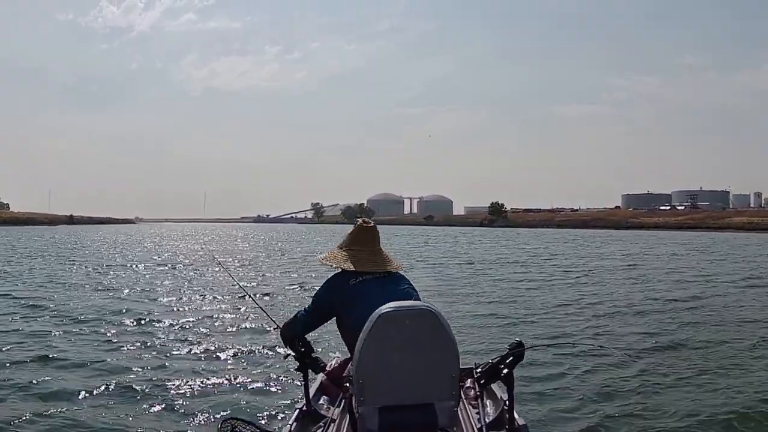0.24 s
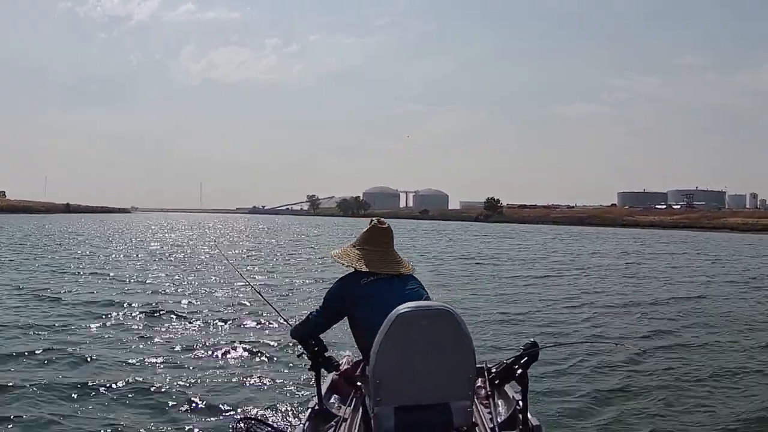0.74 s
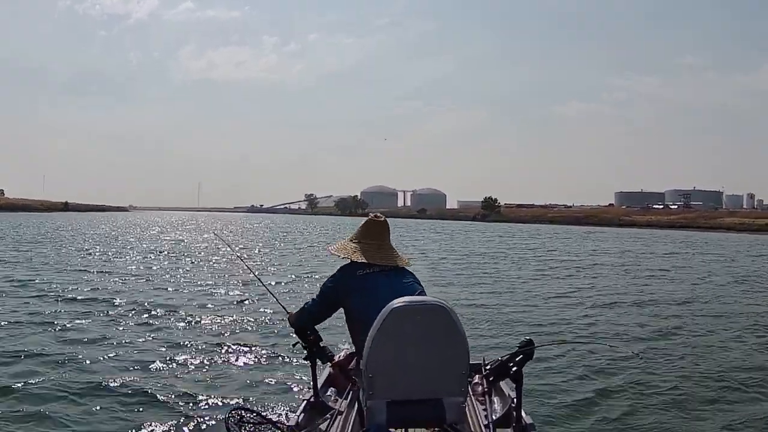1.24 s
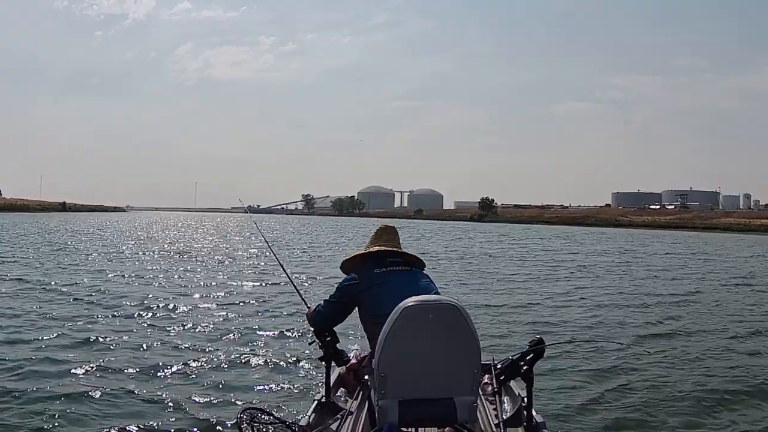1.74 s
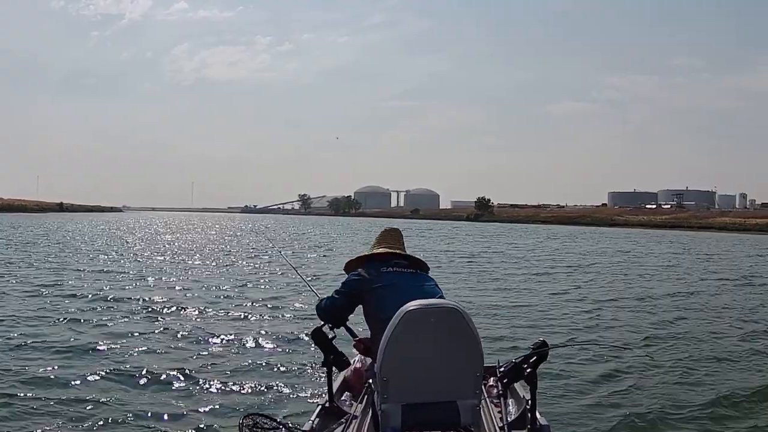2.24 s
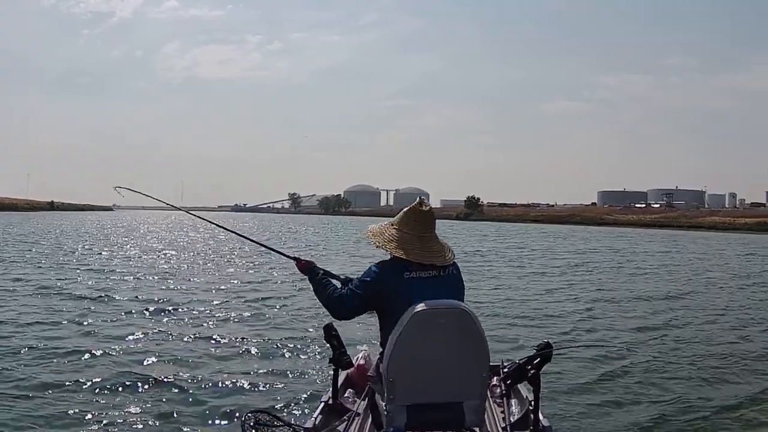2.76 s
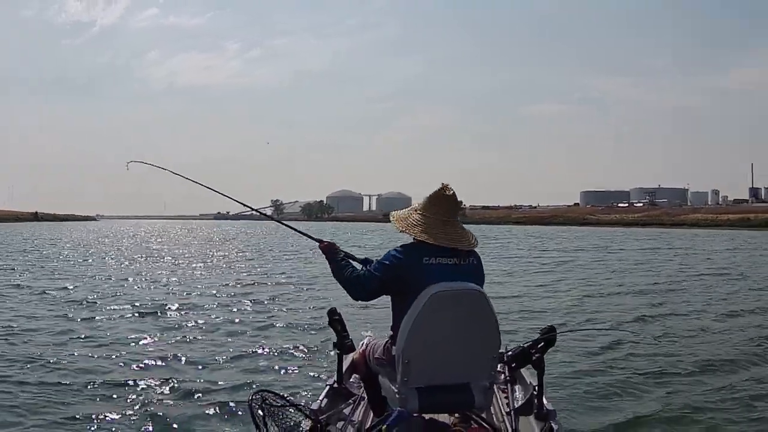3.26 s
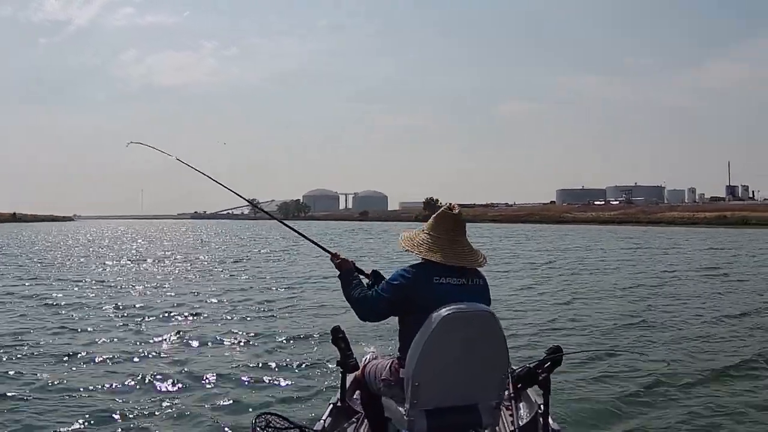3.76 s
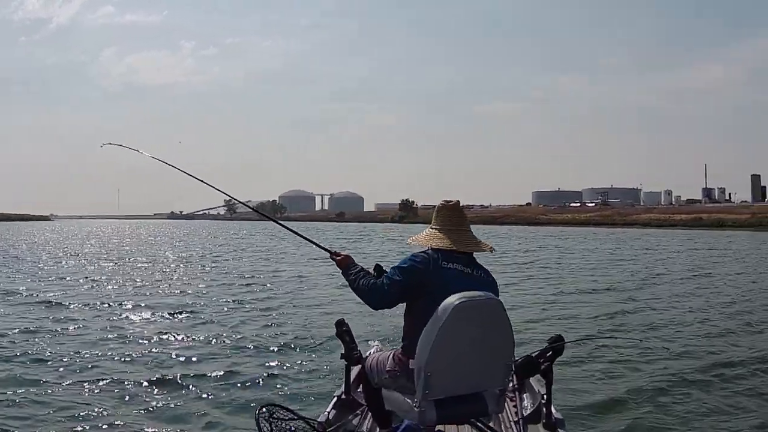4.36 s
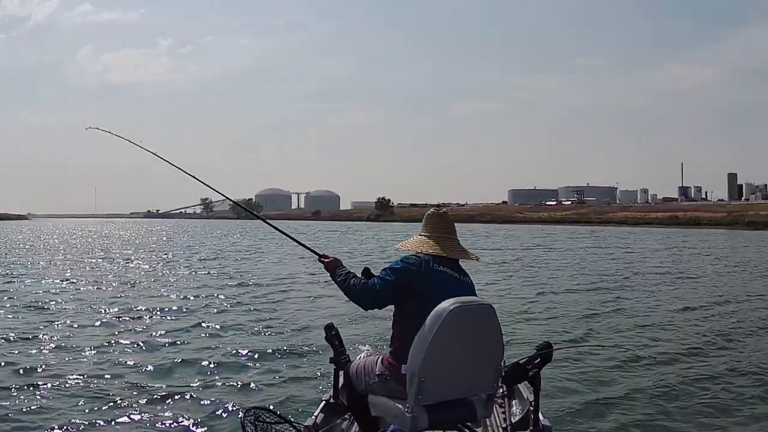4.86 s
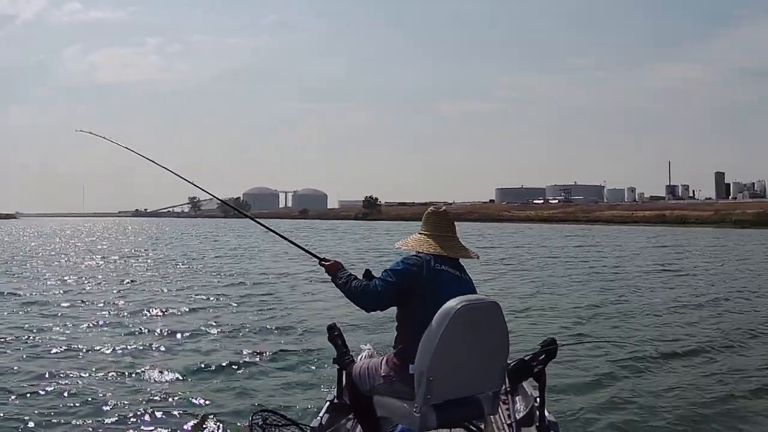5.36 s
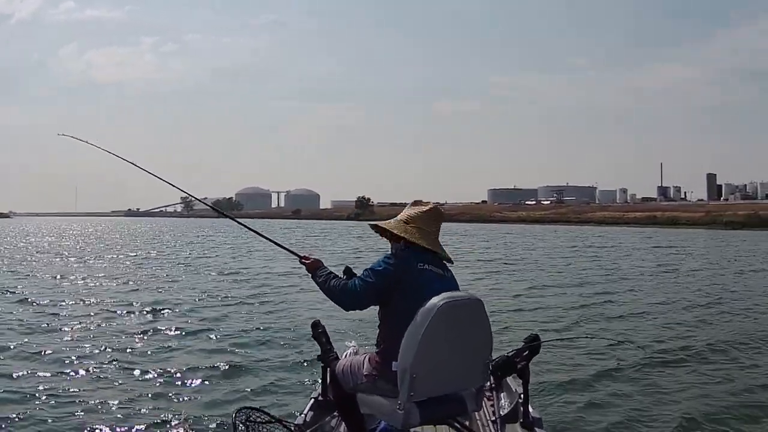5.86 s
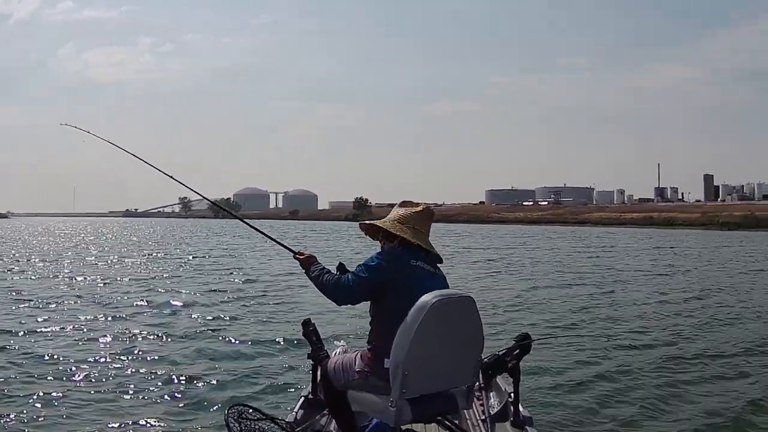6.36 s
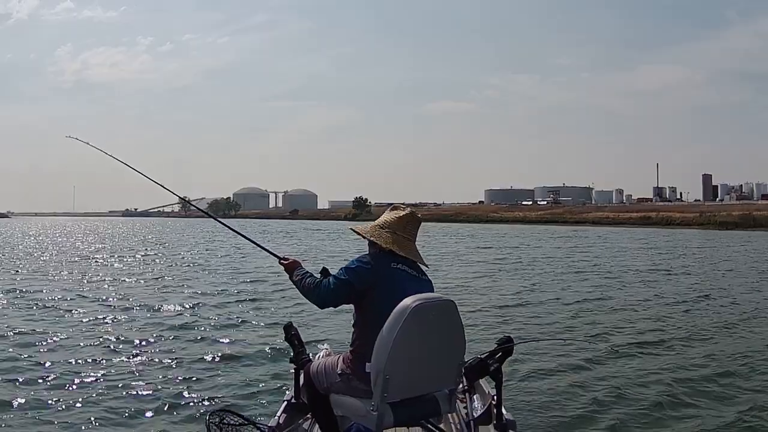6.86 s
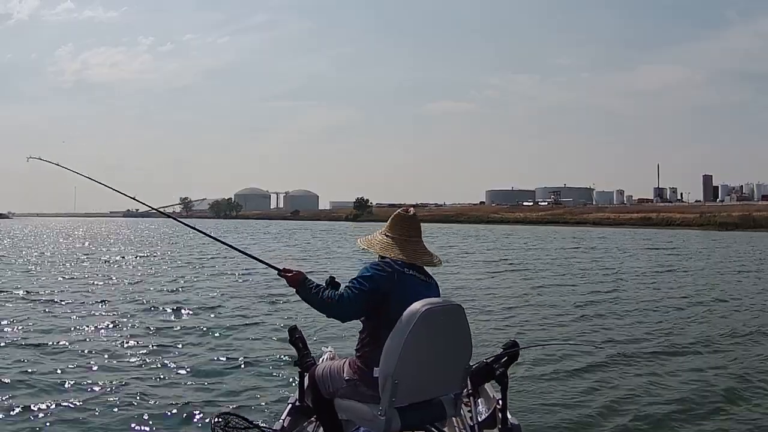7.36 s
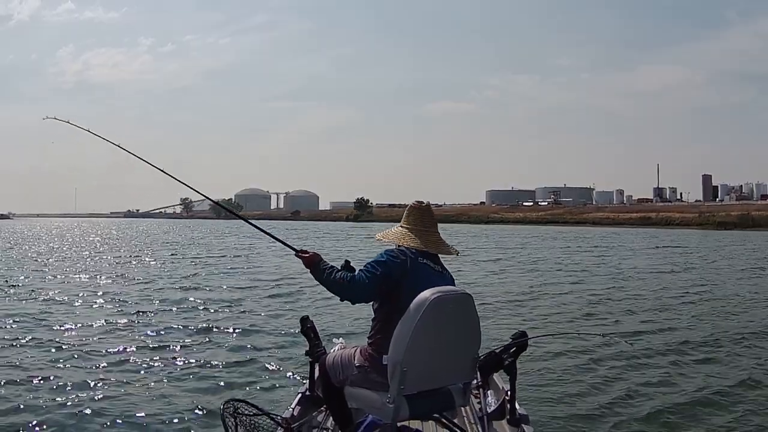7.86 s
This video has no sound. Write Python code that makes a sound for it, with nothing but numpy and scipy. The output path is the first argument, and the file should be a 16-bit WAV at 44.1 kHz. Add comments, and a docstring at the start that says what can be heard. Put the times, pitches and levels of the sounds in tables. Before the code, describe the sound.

Close up on a small boat, a fishing reel clicks dryly and irregularly, at first only an isolated click and bumps, then a dense chattering run. Loose-part rattles bounce between further bursts, with louder knocks in the middle. It thins to a near pause, then clicks again more softly. A faint low motor hum stays far away, and gusty wind rumbles lightly on the microphone outdoors.

```python
"""A fishing reel is cranked on a small boat, heard close by through the hull: its pawl drops from tooth
to tooth and rebounds, each blow exciting damped modes. A loose part rattles in bouncing runs, dull bumps
ring low, and hands and gear rub and slide as flickering coloured noise. Far over the water a motor hums
in wavering sines; wind rumbles on the microphone in gusty low noise over steady outdoor air."""
import sys
import numpy as np
from scipy import signal
from scipy.fft import rfft, irfft, next_fast_len
from scipy.io import wavfile
from scipy.ndimage import uniform_filter1d, map_coordinates

SR = 44100
rng = np.random.default_rng(int(sys.argv[2]) if len(sys.argv) > 2 else 0)


def put_to_file(sound):
    """Save the sound as 16-bit audio at rate SR, in the file named by the first command-line argument."""
    columns = np.atleast_2d(sound).T  # one column per channel
    safe = np.clip(columns, -1, 1)
    whole_steps = np.round(safe * 32767)
    wavfile.write(sys.argv[1], SR, whole_steps.astype(np.int16))


N = 357651  # length in samples

# Pawl drops. Each row: start in seconds, level of the crack in dB, level of the housing in dB.
PAWL_DROPS = [(0.468, -35.5, -22.5), (1.3238, -41, -34), (1.3635, -35.5, -27), (1.3741, -32, -31.5),
              (1.4022, -51, -48), (1.5048, -36, -29.5), (1.5412, -34.5, -29), (1.5937, -26.5, -26.5),
              (1.6246, -35, -28), (1.6297, -36, -42), (1.6715, -30, -24.5), (1.687, -33, -36),
              (1.7056, -38, -28), (1.7115, -39, -30), (1.7241, -37, -42), (1.7443, -41.5, -30.5),
              (1.7505, -40.5, -34), (1.7845, -46, -36.5), (1.8341, -40.5, -31), (1.84, -44.5, -31),
              (1.878, -36, -28.5), (1.884, -38, -36), (1.93, -29, -25.5), (1.9652, -33, -29.5),
              (2.0644, -43.5, -35), (2.1385, -37.5, -29.5), (2.1843, -29, -25.5), (2.2309, -29.5, -25),
              (2.2649, -40, -30), (2.2682, -39.5, -39), (2.3074, -31, -28), (2.3166, -45.5, -50),
              (2.3575, -36, -30.5), (2.3865, -37, -30.5), (2.4542, -35, -32), (2.4802, -36.5, -30.5),
              (2.526, -49, -40), (2.5376, -33.5, -29), (2.546, -38, -39), (2.5702, -36, -29),
              (2.5888, -38.5, -36), (2.6106, -36, -28.5), (2.6192, -38.5, -35), (2.6522, -34, -26.5),
              (2.6592, -40.5, -30), (2.698, -31.5, -23.5), (2.7045, -34.5, -29), (2.7455, -26.5, -23),
              (3.4145, -30, -17.5), (3.4269, -37, -30), (3.4333, -43, -31), (3.4441, -41, -35),
              (3.4646, -29.5, -23), (3.474, -37, -24.5), (3.4859, -27.5, -26), (3.4945, -32.5, -30),
              (3.4977, -31.5, -25.5), (3.5129, -36, -26), (3.5197, -39, -31), (3.5616, -35, -31),
              (3.6037, -37.5, -29), (3.6441, -47, -37), (3.6517, -48, -35.5), (3.659, -46, -45),
              (3.6874, -43, -30.5), (4.2654, -27, -21), (4.2747, -39.5, -34), (4.2862, -42, -40),
              (4.3324, -52, -29), (4.3358, -35, -24), (4.3433, -26.5, -24), (4.3608, -52, -40),
              (4.392, -34, -28.5), (4.5619, -23.5, -17), (4.6041, -30, -20.5), (4.6588, -52.5, -46),
              (4.6995, -33, -35), (4.7076, -36.5, -29.5), (4.7301, -45, -32), (4.94, -67, -35.5),
              (5.0019, -32, -22.5), (5.0306, -32.5, -24.5), (5.0391, -50, -39), (5.0638, -53, -34),
              (5.2569, -48.5, -40.5), (6.464, -59, -45), (6.4773, -59, -43), (6.4885, -32.5, -27),
              (6.503, -37, -31), (6.5474, -41, -34), (6.5625, -44, -39), (6.5947, -47, -35.5),
              (6.6004, -57.5, -44), (6.6385, -49.5, -37.5), (6.6448, -46.5, -47), (6.7296, -46, -34),
              (6.8148, -34, -29.5), (6.8571, -30.5, -29), (6.8987, -29, -25), (6.9438, -32, -28.5),
              (6.9823, -36.5, -30), (6.9953, -39.5, -38), (7.032, -43.5, -33), (7.0375, -40, -34.5),
              (7.0735, -38, -31), (7.0785, -32.5, -29.5), (7.1213, -33.5, -29.5), (7.1487, -52.5, -37),
              (7.1957, -40.5, -28.5), (7.2799, -46.5, -33.5), (7.329, -35.5, -28), (7.3902, -39, -31.5),
              (7.4095, -40, -36), (7.4286, -36.5, -30), (7.4345, -47, -41), (7.4475, -44, -34.5),
              (7.5177, -52, -43.5), (8.0473, -25, -21), (8.0502, -29, -32.5), (8.0695, -35.5, -28.5)]
# Mean delay of the rebound in seconds, its mean level over the crack in dB, its level scatter in dB.
REBOUND_S, REBOUND_DB, REBOUND_SCATTER_DB = 0.00084, -4.5, 4

# Modes of the crack, the rebounding spring, the reel housing, the hard plate and the plate's treble.
# Each row: mean frequency in Hz, mean relative level in dB, time to decay by 60 dB in seconds.
CRACK_MODES = [(2350, 1.5, 0.0081), (2910, 13.5, 0.0052), (3982, 0.5, 0.013), (4993, 7.5, 0.0054),
               (6070, 10.5, 0.0037), (6550, -0.5, 0.0048), (8270, 0, 0.0054), (10300, -22.5, 0.001),
               (13190, -16, .004)]
SPRING_MODES = [(3936, -4, 0.016), (4440, -11.5, 0.015), (6500, -9.5, 0.0027), (8466, 0.5, 0.0043)]
HOUSING_MODES = [(795, 2, 0.024), (728, -13.5, 0.052), (879, -4, 0.019), (559, -23.5, 0.0047),
                 (1119, -8, 0.02), (1551, -11.5, 0.016)]
PLATE_MODES = [(1516, -4.5, 0.0088), (2376, -6, 0.0083), (2729, 5, 0.0077), (2956, 2.5, 0.0081),
               (3830, 0, 0.0053), (4510, 2, 0.006), (5400, -8.5, 0.0061)]
EDGE_MODES = [(6050, 10, 0.0031), (7980, 12, 0.0021), (10000, -4, 0.0043), (11100, -13.5, 0.0031),
              (13000, -7, 0.0036), (15000, -18, .003)]

# A loose part drops on a hard plate and bounces. Each row: start in seconds, level of the first tick in dB,
# first flight in seconds, ratio of each flight to the one before, loss per bounce in dB (below 0: shaken
# ever harder), length of the run in seconds, treble over the first tick in dB.
RATTLE_RUNS = [(0.8624, -23.5, .0150, .75, 2.5, .044, -17), (1.1572, -41, .0140, 1, -4.5, .032, -17),
               (1.211, -36, .0236, 1, -14, .03, -14), (2.9585, -25.5, .0255, .69, 2.5, .072, -15.5),
               (3.2288, -16.5, .0232, .70, 5, .067, -8.5), (3.9014, -40.5, 0.0057, 1.2, -7, .01, -12),
               (3.915, -24, .0200, .70, 3, .052, -14), (4.12, -16.5, .0235, .89, 5, .085, -8.5),
               (4.69, -31.5, .0085, 1, 0, .004, -20), (4.723, -21.5, .0133, .78, 6, .044, -8),
               (5.6431, -40.5, 0.01, .7, 5, .011, -26), (6.0827, -34, .01, .7, 4, .004, -24),
               (7.4785, -38.5, .0112, .7, 9, .013, -13.5), (7.8153, -37, .012, .7, 4.5, .014, -32),
               (7.8569, -44.5, .01, .7, 4, .004, -19), (7.897, -53.5, .01, .7, 6, .004, -17)]
# Housing level in dB at a tick of -29.5 dB, its growth in dB per dB of tick.
ANSWER_DB, ANSWER_GROWTH = -37.5, .6
TREBLE_LOSS_DB = 1  # treble lost per bounce, beyond the loss of the tick

# Dull bumps on the boat. Each row: start in seconds, level in dB, mean pitch in Hz.
BUMPS = [(0.166, -41, 1060), (0.282, -44, 745), (0.332, -40, 390), (1.132, -28.5, 895), (1.133, -37, 1520),
         (1.136, -32, 446), (1.15, -31, 298), (2.904, -31, 685), (3.816, -30.5, 653), (4.254, -42, 776),
         (4.335, -22, 730), (4.836, -46.5, 790), (4.887, -52.5, 780), (5.121, -45, 790),
         (5.149, -39.5, 780), (5.4, -39.5, 714), (6.782, -44, 930), (7.594, -40.5, 1020),
         (7.612, -47, 1080)]

# Continuous friction. Each row: time in seconds, rubbing in the housing in dB, gear hiss in dB.
FRICTION_LEVELS = [(0.0, -52, -70), (0.9, -60, -73), (1.58, -59, -74), (1.76, -46.5, -69), (1.94, -63, -71),
                   (2.17, -56, -71), (2.53, -57.5, -72.5), (2.73, -57.5, -76), (3.03, -64, -69.5),
                   (3.66, -53, -68), (3.97, -59.5, -64.5), (4.52, -59, -77.5), (5.08, -56.5, -67.5),
                   (5.64, -64.5, -79.5), (6.53, -66, -78), (6.98, -57, -68.5), (7.61, -65.5, -78),
                   (8.11, -59.5, -68)]
# Short rubs of hands and gear. Each row: start in seconds, end in seconds, housing in dB, gear hiss in dB.
RUBS = [(1.131, 1.155, -30, -51), (1.167, 1.228, -39, -57.5), (3.032, 3.072, -53, -60.5),
        (3.194, 3.219, -55, -60.5), (3.681, 3.752, -52, -53), (3.838, 3.905, -59, -83),
        (4.29, 4.355, -40.5, -48), (4.644, 4.668, -49, -56.5), (4.732, 4.801, -43.5, -63),
        (4.943, 5.005, -56, -63), (5.119, 5.202, -53, -77), (5.229, 5.312, -55, -65),
        (7.389, 7.483, -46.5, -66), (7.578, 7.684, -55, -83), (8.066, 8.105, -44.5, -59)]
# Something hard slides over the plate. Each row: start in seconds, end in seconds, level in dB.
SCRAPES = [(0.829, 0.85, -44), (3.458, 3.47, -31.5), (3.901, 3.929, -34), (4.693, 4.703, -32.5),
           (5.208, 5.224, -38.5), (5.59, 5.668, -54.5), (7.852, 7.876, -57.5)]
SCRAPE_HOUSING_DB, SCRAPE_HISS_DB = 5, -13  # housing and gear hiss over the plate, in dB

# Noise spectra of housing rub, plate scrape and gear hiss.
# Each row: frequency in Hz, relative density in dB per Hz.
RUB_SPECTRUM = [(300, -46.5), (500, -1), (750, 2), (1150, -3), (1350, -9.5), (1800, -47.5)]
SCRAPE_SPECTRUM = [(1250, -30), (1550, -1), (1900, -18), (2500, -10), (3050, -1), (3600, -20), (4100, -12),
                   (4600, 0), (5100, -3), (5600, -24), (7000, -40), (15000, -70)]
HISS_SPECTRUM = [(900, -39.5), (1500, 2), (2000, -5.5), (2400, -3.5), (3000, -5.5), (3450, -6.5),
                 (3950, -4.5), (4600, -8.5), (5400, -12.5), (7000, -16), (10000, -27), (15000, -29.5)]

# Lines of the distant motor. Each row: mean frequency in Hz, mean rms level in dB.
MOTOR_LINES = [(96.9, -52.5), (140.0, -62.5), (193.8, -67.5), (290.7, -68)]

# Wind on the microphone. Each row: time in seconds, mean deep rumble in dB, mean wash in dB.
WIND_LEVELS = [(0.0, -67, -44), (0.15, -53, -53), (0.43, -49, -41.5), (0.67, -58, -52), (0.74, -49.5, -41),
               (1.04, -58, -47), (1.15, -42, -39.5), (1.33, -43, -58), (1.5, -50, -47), (1.93, -50, -43),
               (2.03, -58, -57.5), (2.75, -41.5, -48), (2.94, -51, -55.5), (4.0, -50, -54),
               (4.4, -56.5, -46), (4.54, -57.5, -56.5), (5.08, -52, -48.5), (5.2, -47, -44),
               (5.51, -44, -45), (5.59, -60.5, -56), (7.0, -57.5, -57.5), (7.15, -50, -44),
               (7.25, -57, -57), (8.11, -53, -55)]
# Noise spectra of deep wind rumble, wind wash and outdoor air.
# Each row: frequency in Hz, relative density in dB per Hz.
RUMBLE_SPECTRUM = [(20, -25), (50, -15.5), (90, 0.5), (120, -0.5), (170, -28.5), (300, -60.5)]
WASH_SPECTRUM = [(70, -40.5), (130, -1.5), (200, 2), (300, -9), (420, -16.5), (600, -28), (900, -66)]
AIR_SPECTRUM = [(20, -30.5), (70, -6), (200, -12), (400, -30.5), (1100, -27.5), (1400, -36.5),
                (3000, -42.5), (16000, -43)]

TOP_HZ = 16000  # upper band limit of the microphone


def amp(db):
    """Logarithmic level: the gain that belongs to a level in dB."""
    return 10 ** (np.asarray(db) / 20)


def unit(x):
    """Power normalisation: x at rms 1."""
    return x / np.sqrt(np.mean(x ** 2) + 1e-20)


def wobble(rate):
    """Slow random fluctuation: a smooth curve through rate random knots a second."""
    knots = rng.standard_normal(int(N * rate / SR) + 4)
    return map_coordinates(knots, [np.arange(N) * rate / SR])


def curves(rows):
    """Linear interpolation of level: one gain per sample for each dB column after the time."""
    times, *columns = np.transpose(rows)
    return [amp(np.interp(np.arange(N) / SR, times, db)) for db in columns]


def filtered(x, response):
    """Linear filtering: the spectrum of x times a response of frequency."""
    size = next_fast_len(N + 8192)
    spectrum = rfft(x, size) * response(np.fft.rfftfreq(size, 1 / SR))
    return irfft(spectrum, size)[..., :N]


def rush(spectrum, grain_db, grain_rate, patchy_db=0):
    """Filtered noise: coloured, of rms 1, its drive flickering in grains and swelling in narrow patches."""
    f, db = np.transpose(spectrum)
    grains = rng.standard_normal(N) * amp(grain_db * wobble(grain_rate))
    z = signal.stft(grains, nperseg=256)[2]
    # Patches are smoothed over 3 frequency bins and 16 time frames.
    patches = uniform_filter1d(rng.standard_normal(z.shape), size=3, axis=0)
    patches = uniform_filter1d(patches, size=16, axis=1)
    drive = signal.istft(z * amp(patchy_db * unit(patches)), nperseg=256)[1][:N]

    def colour(hz):
        """Spectral envelope: density over log frequency, almost nothing below the first row."""
        return amp(np.interp(np.log(hz + 1), np.log(f), db, -120, db[-1]))

    return unit(filtered(drive, colour))


def add_blow(out, s, db, modes, chatter, chatter_s, attack, echo_db):
    """Modal impact: damped modes, chattering contacts and hull scatter; db is the rms level over 5 ms."""
    t = np.arange(2600) / SR
    hz, level, t60 = np.transpose(modes)[:, :, None]
    # Every blow excites each mode at a new strength (2.5 dB) and pitch (1.8 %).
    level_luck = 2.5 * rng.standard_normal((len(modes), 1))
    pitch_luck = .018 * rng.standard_normal((len(modes), 1))
    decay = amp(level + level_luck - 60 * t / t60)
    ring = np.sum(decay * np.sin(2 * np.pi * hz * (1 + pitch_luck) * t), 0)

    # The chatter holds, then stops.
    settle = np.exp(-(t / (chatter_s * amp(2.2 * rng.standard_normal()))) ** 2)
    touching = rng.random(len(t)) < .1
    contacts = chatter * rng.standard_normal(len(t)) * touching * settle
    contacts += amp(echo_db - 60 * t / 0.06) * rng.standard_normal(len(t))  # hull scatter
    contacts[0] = 1  # the blow itself

    ring = signal.fftconvolve(ring, contacts)[:len(t)]
    ring *= 1 - np.exp(-(t / attack) ** 2)
    out[max(round(s * SR), 0):][:len(t)] += amp(db) * ring / np.sqrt(np.mean(ring[:220] ** 2))


def pawl():
    """Impact and rebound: each drop cracks and thumps the housing; a rebound just after rings the spring."""
    out = np.zeros(N + SR)
    delays = rng.exponential(size=len(PAWL_DROPS))
    lucks = rng.standard_normal(len(PAWL_DROPS))
    for (s, crack_db, housing_db), delay, luck in zip(PAWL_DROPS, delays, lucks):
        add_blow(out, s, crack_db, CRACK_MODES,
                 chatter=0.17, chatter_s=0.0042, attack=0.00037, echo_db=-44.5)
        add_blow(out, s, housing_db, HOUSING_MODES,
                 chatter=0.021, chatter_s=0.005, attack=0.0018, echo_db=-42.0)
        rebound_db = crack_db + REBOUND_DB + REBOUND_SCATTER_DB * luck
        add_blow(out, s + REBOUND_S * delay, rebound_db, SPRING_MODES,
                 chatter=0.048, chatter_s=0.0029, attack=0.00066, echo_db=-49.5)
    return out[:N]


def rattle():
    """Restitution: flights follow a geometric series; the housing answers each plate tick 1 ms later."""
    out = np.zeros(N + SR)
    bounces = np.arange(7)  # at most seven ticks a run
    for start, first_db, flight, ratio, loss_db, length, treble_db in RATTLE_RUNS:
        flights = flight * ratio ** bounces
        after = np.cumsum(flights) - flights
        for s, bounce in zip(start + after[after < length], bounces):
            tick_db = first_db - loss_db * bounce
            add_blow(out, s, tick_db, PLATE_MODES,
                     chatter=0.027, chatter_s=0.0016, attack=0.0012, echo_db=-56.0)
            add_blow(out, s, tick_db + treble_db - TREBLE_LOSS_DB * bounce, EDGE_MODES,
                     chatter=0.16, chatter_s=0.0025, attack=0.00023, echo_db=-52.5)
            answer_db = ANSWER_DB + ANSWER_GROWTH * (tick_db + 29.5)
            add_blow(out, s + .001, answer_db, HOUSING_MODES,
                     chatter=0.072, chatter_s=0.0017, attack=0.0032, echo_db=-39.5)
    return out[:N]


def bumps():
    """Soft contact: a gradual onset excites a short low ring with two neighbouring modes."""
    out = np.zeros(N + SR)
    for s, db, hz in BUMPS:
        modes = [(hz, 0, .025), (0.825 * hz, -6, .025), (1.42 * hz, -8, .02)]
        add_blow(out, s, db, modes, chatter=0.074, chatter_s=0.0079, attack=0.00152, echo_db=-38.5)
    return out[:N]


def press(start, end):
    """Contact pressure: one stroke comes on quickly, eases and lets go."""
    times = [start - .003, start + .002, end - .004, end + .006]
    return np.interp(np.arange(N) / SR, times, [0, 1, .6, 0])


def handling():
    """Friction noise: housing and gears rub all along; rubs press harder, slides also scrape the plate."""
    rub, hiss = curves(FRICTION_LEVELS)
    scrape = sum(amp(db) * press(start, end) for start, end, db in SCRAPES)
    rub = rub + amp(SCRAPE_HOUSING_DB) * scrape
    hiss = hiss + amp(SCRAPE_HISS_DB) * scrape
    for start, end, housing_db, hiss_db in RUBS:
        stroke = press(start, end)
        rub = rub + amp(housing_db) * stroke
        hiss = hiss + amp(hiss_db) * stroke
    rub = rub * rush(RUB_SPECTRUM, grain_db=2.5, grain_rate=60, patchy_db=2.5)
    scrape = scrape * rush(SCRAPE_SPECTRUM, grain_db=2.5, grain_rate=250)
    hiss = hiss * rush(HISS_SPECTRUM, grain_db=3.0, grain_rate=140, patchy_db=3.5)
    return rub + scrape + hiss


def motor():
    """Periodic rotation: lines share one wavering turn, while each wavers alone in level."""
    turn = 2 * np.pi * np.cumsum(1 + 0.0066 * wobble(6)) / SR
    hum = np.zeros(N)
    for hz, db in MOTOR_LINES:
        hum += np.sqrt(2) * amp(db + 0.73 * wobble(13)) * np.sin(hz * turn)
    return hum


def wind():
    """Turbulent pressure on the microphone: gusty low noise in a deep rumble and a higher wash."""
    rumble, wash = curves(WIND_LEVELS)
    rumble = rumble * amp(1.3 * wobble(5.4)) * rush(RUMBLE_SPECTRUM, grain_db=1.0, grain_rate=11)
    wash = wash * amp(0.5 * wobble(6.3)) * rush(WASH_SPECTRUM, grain_db=2.0, grain_rate=29)
    return rumble + wash


def outdoor_air():
    """Ambient noise: a nearly steady broadband bed at -62 dB rms."""
    return amp(-62) * rush(AIR_SPECTRUM, grain_db=.5, grain_rate=8)


def scene():
    """Superposition: reel and boat close by, motor, wind and air behind."""
    close = pawl() + rattle() + bumps() + handling()
    return (close + motor() + wind() + outdoor_air())[None]


def record(dry):
    """Band limitation: the microphone keeps only what lies below its upper limit."""
    return filtered(dry, lambda hz: hz < TOP_HZ)


dry = scene()
out = record(dry)
put_to_file(out)
```